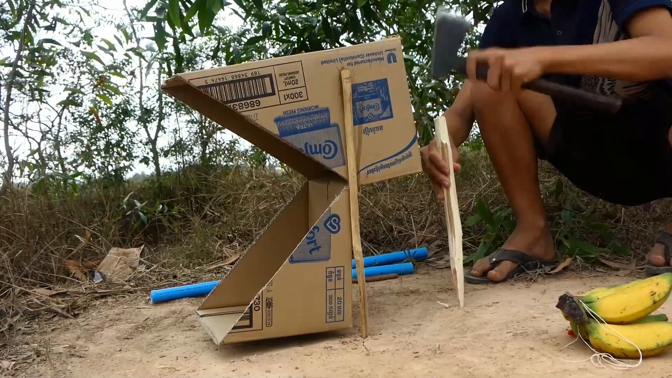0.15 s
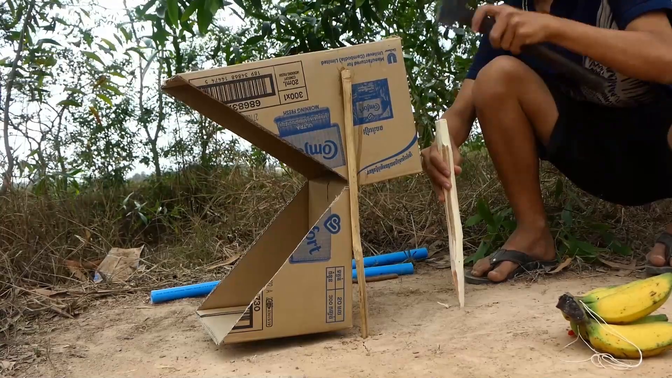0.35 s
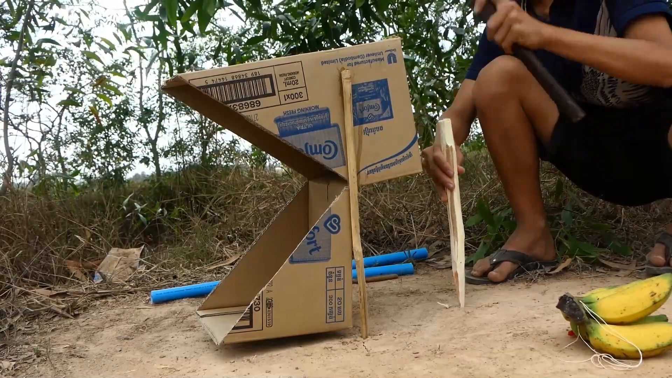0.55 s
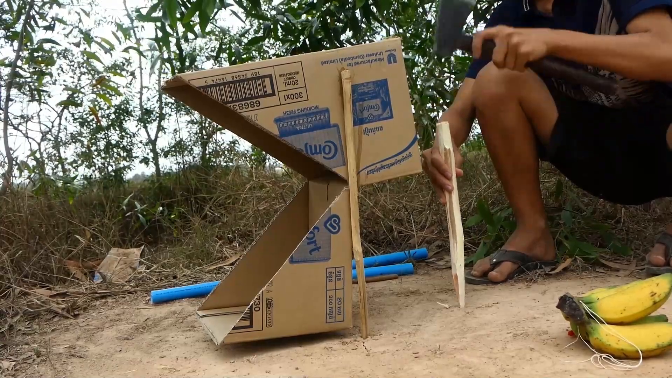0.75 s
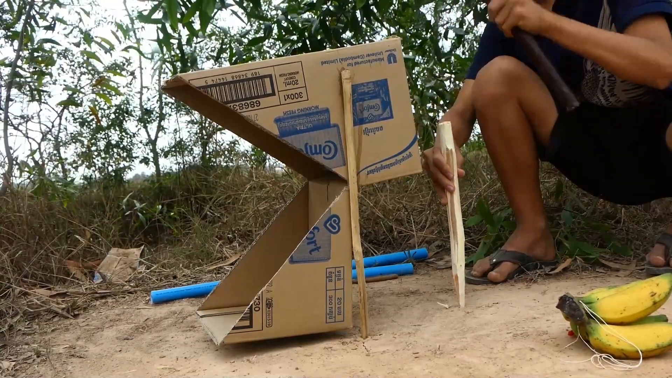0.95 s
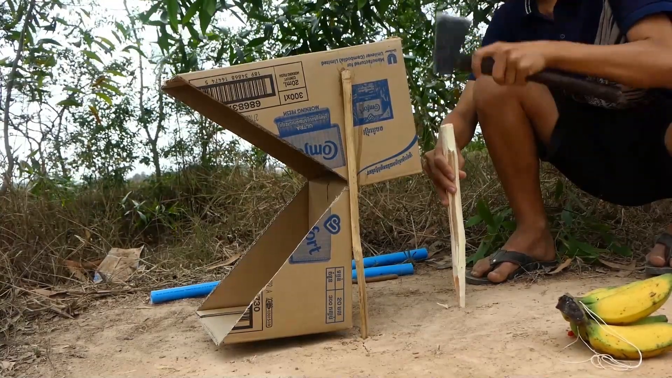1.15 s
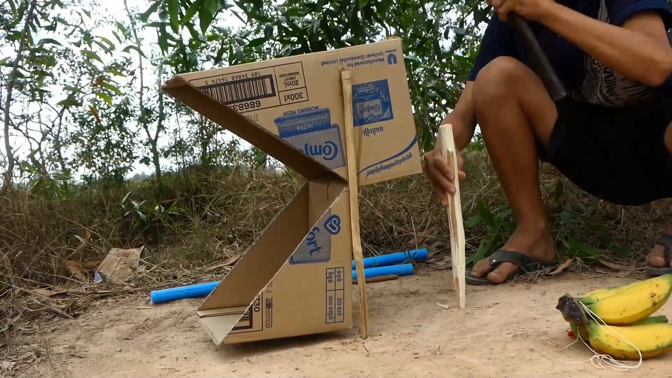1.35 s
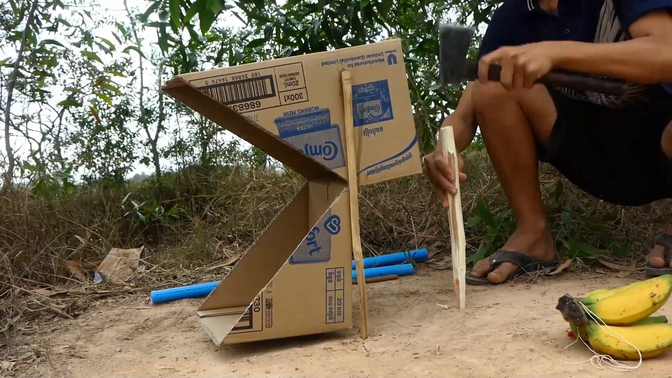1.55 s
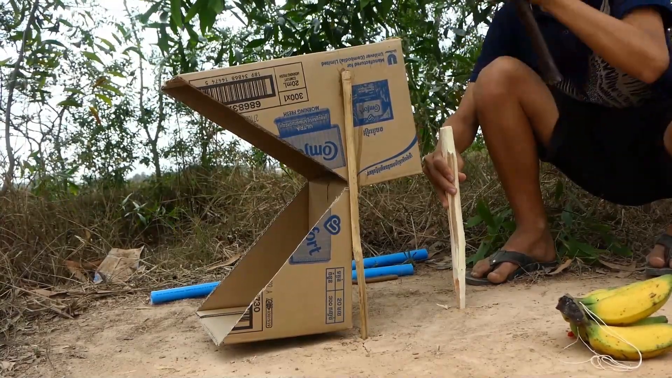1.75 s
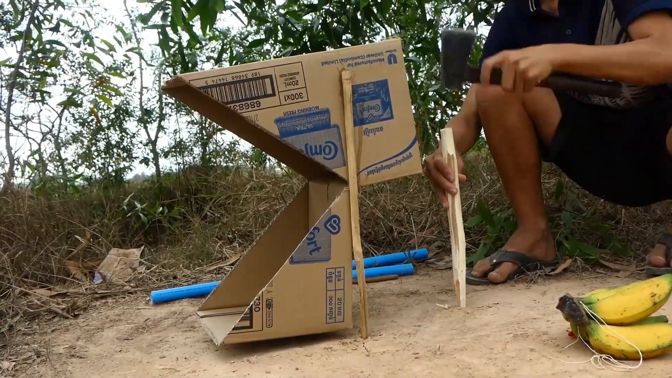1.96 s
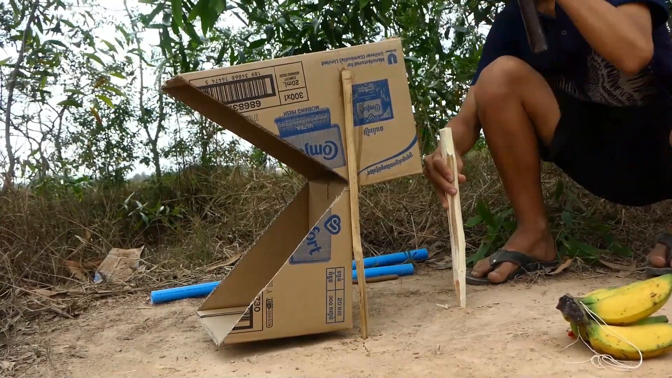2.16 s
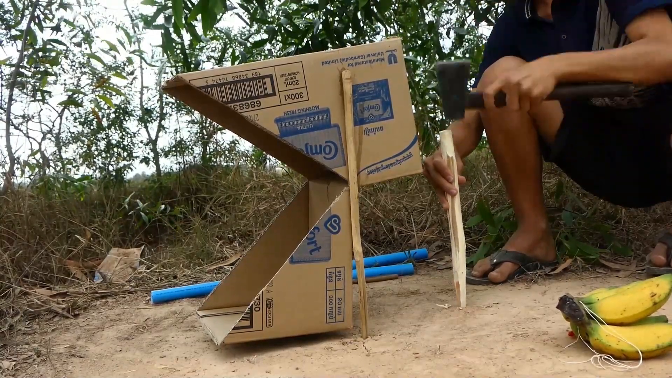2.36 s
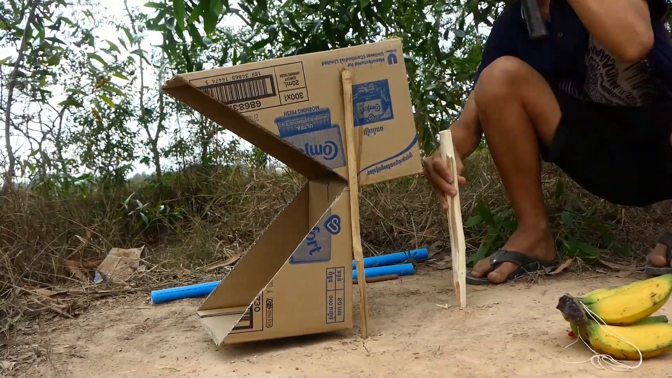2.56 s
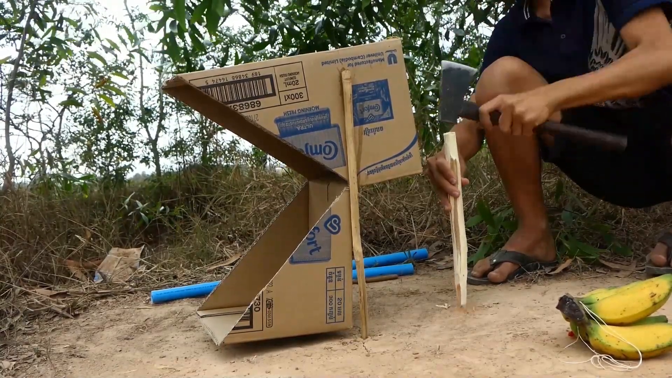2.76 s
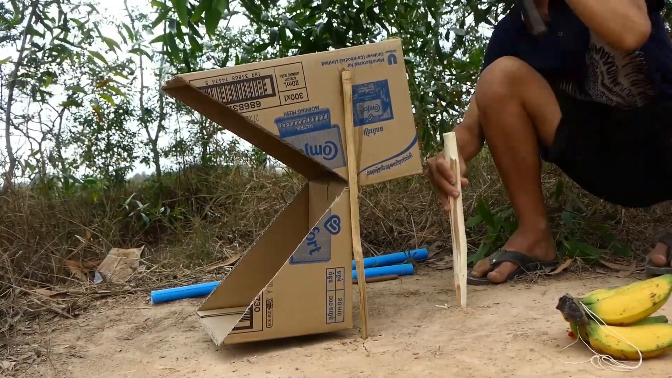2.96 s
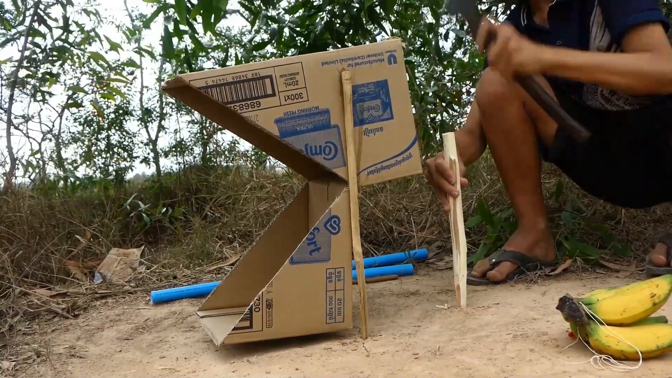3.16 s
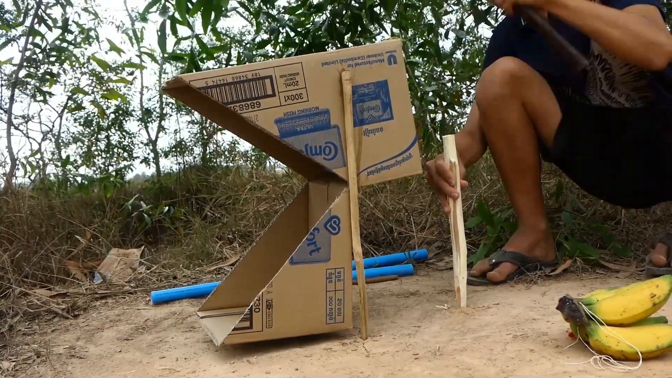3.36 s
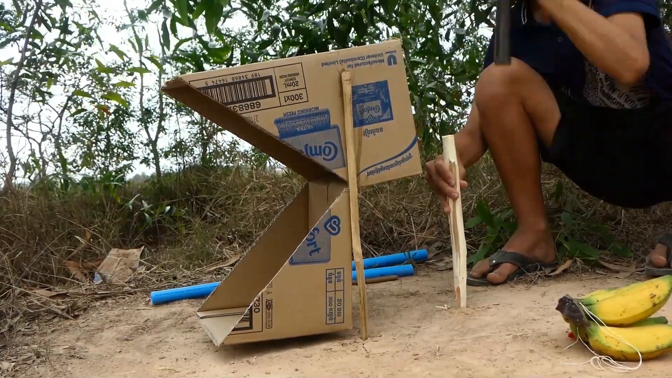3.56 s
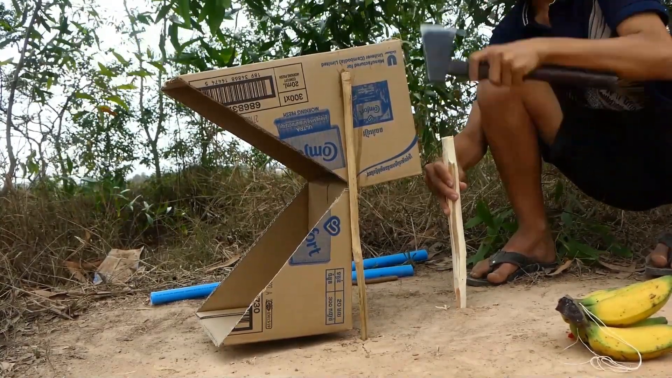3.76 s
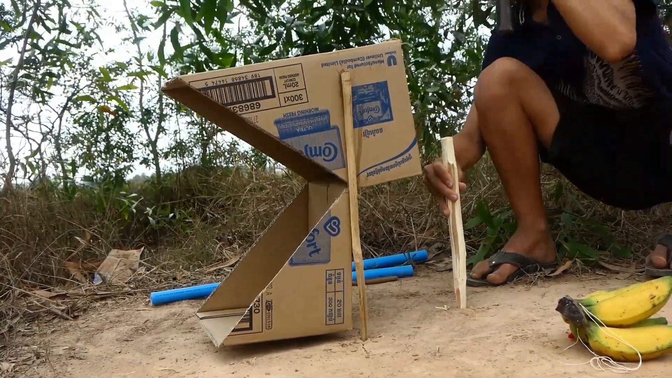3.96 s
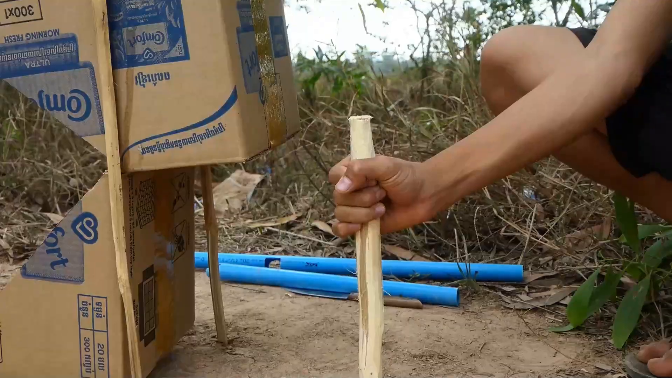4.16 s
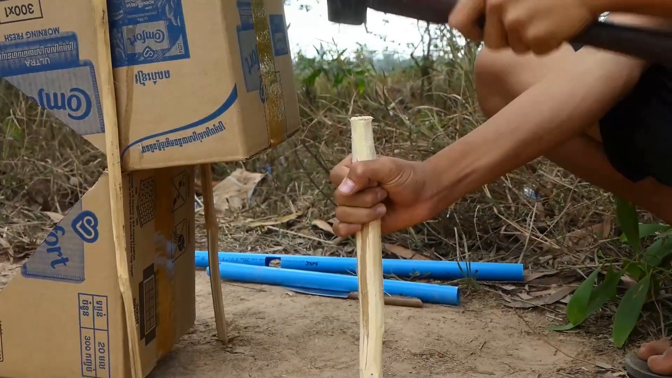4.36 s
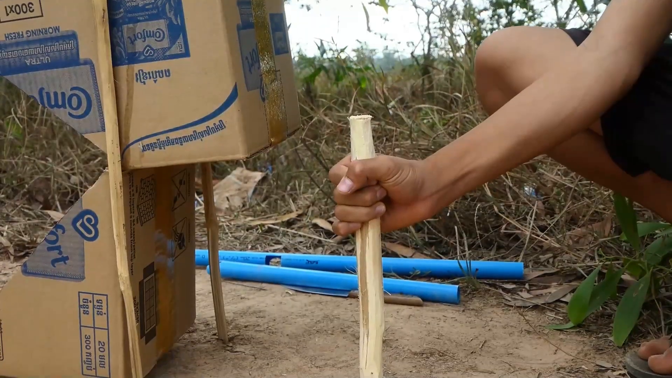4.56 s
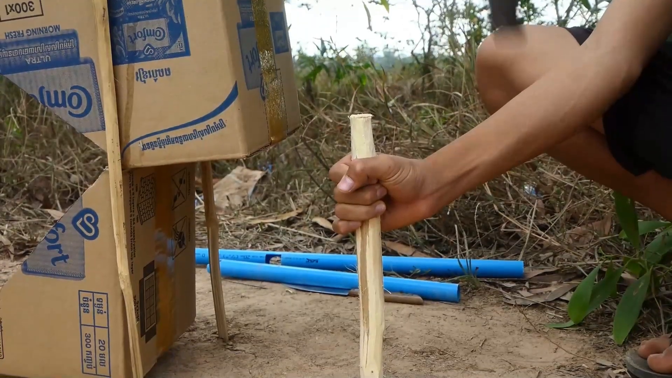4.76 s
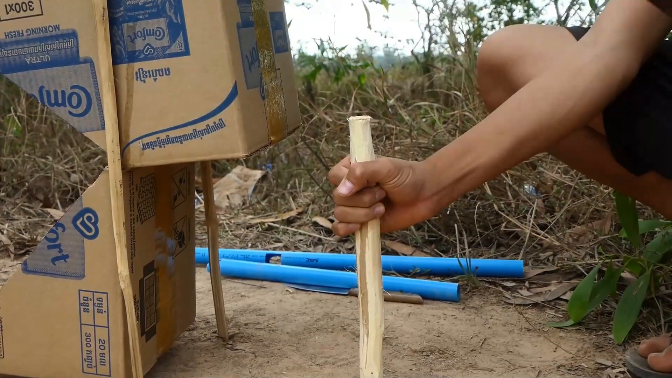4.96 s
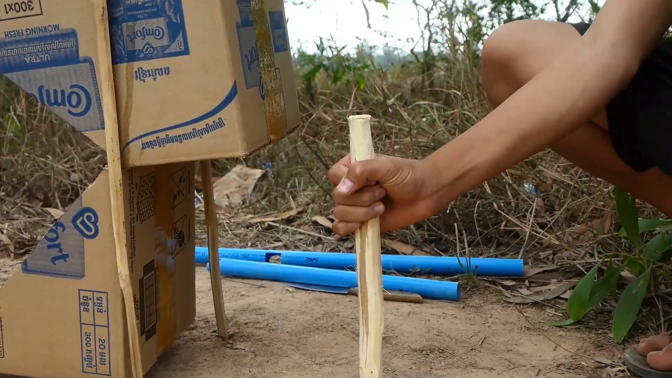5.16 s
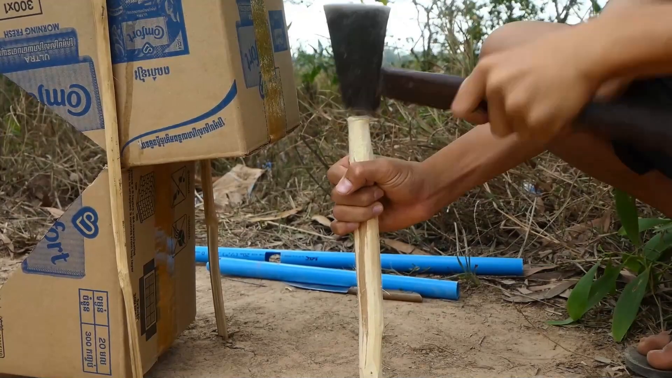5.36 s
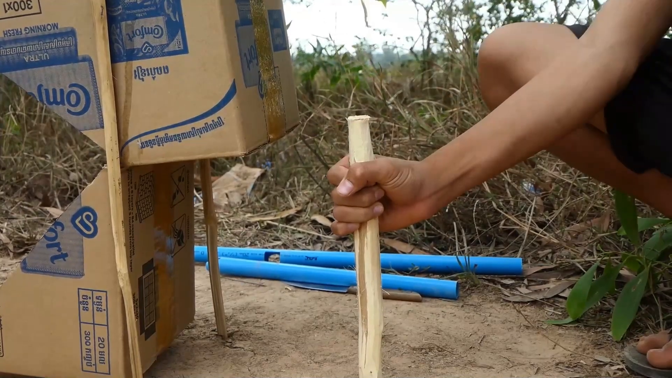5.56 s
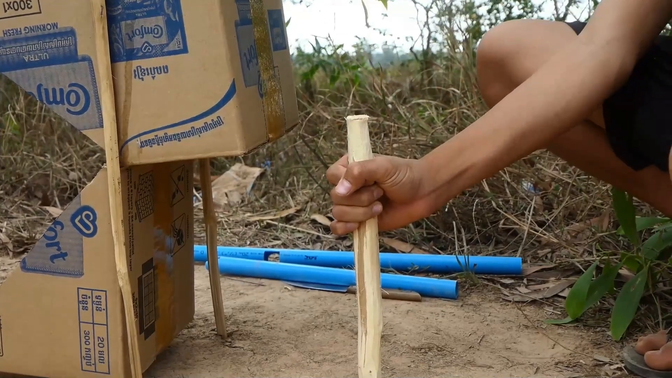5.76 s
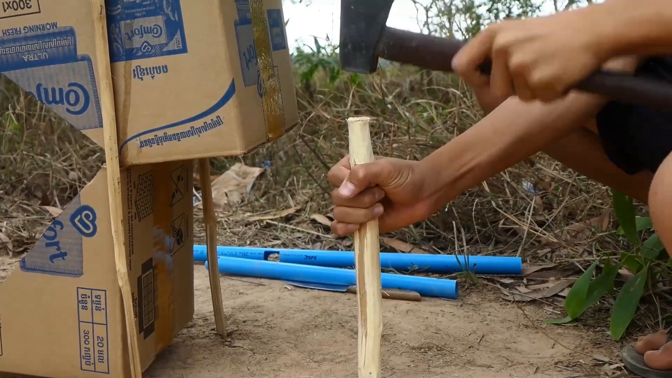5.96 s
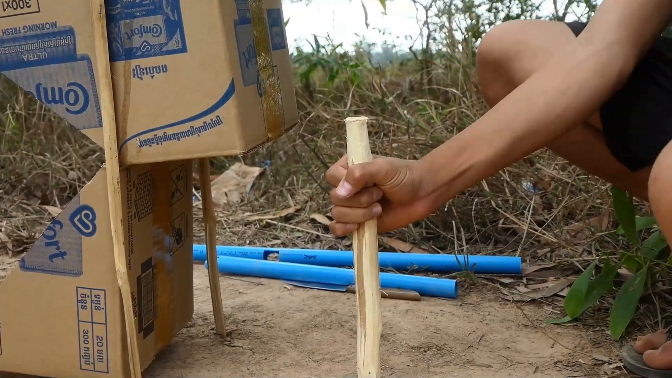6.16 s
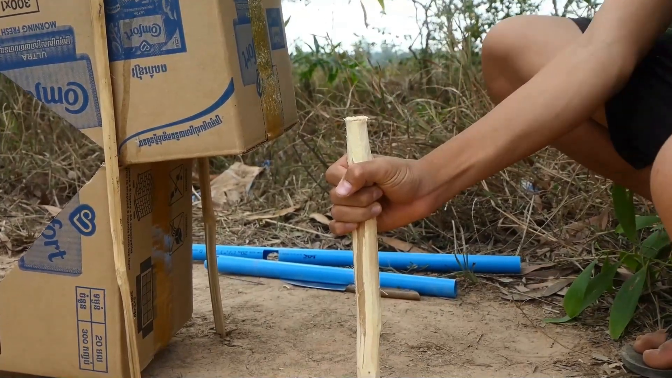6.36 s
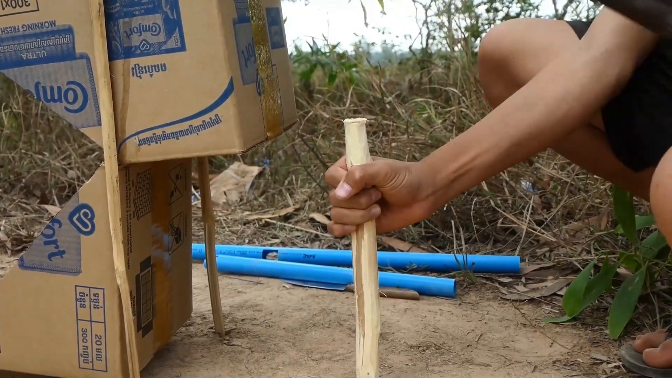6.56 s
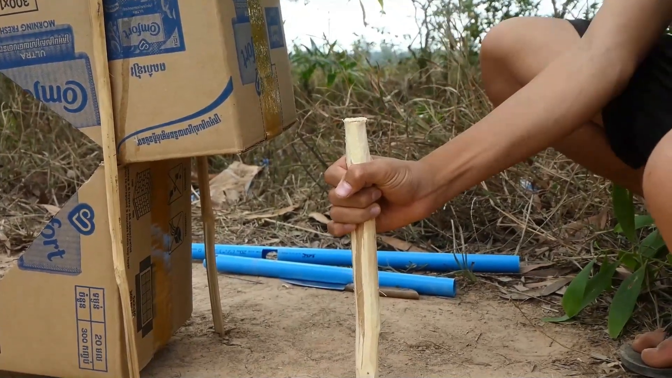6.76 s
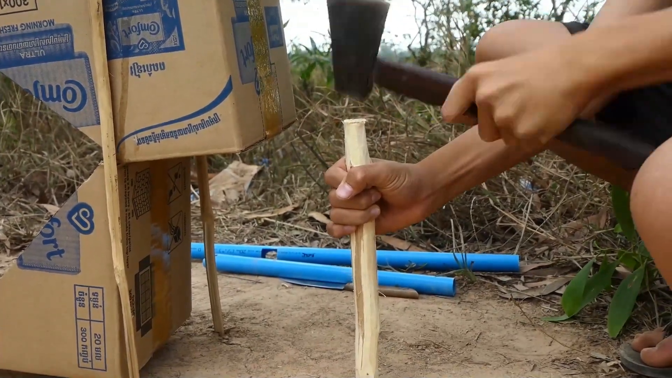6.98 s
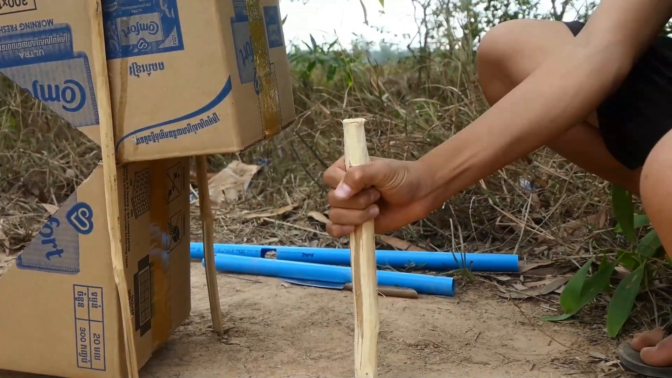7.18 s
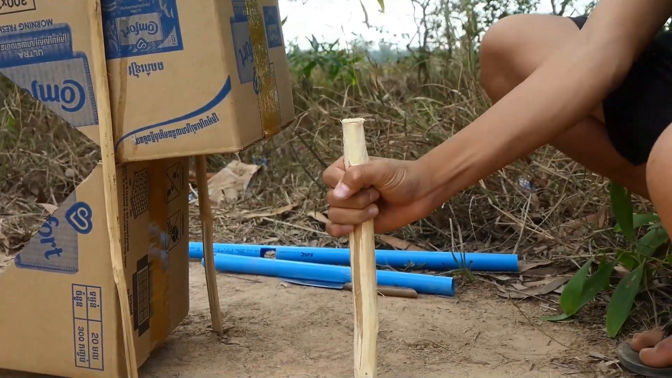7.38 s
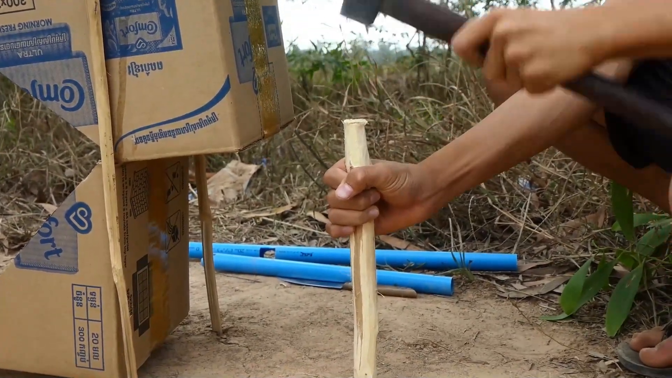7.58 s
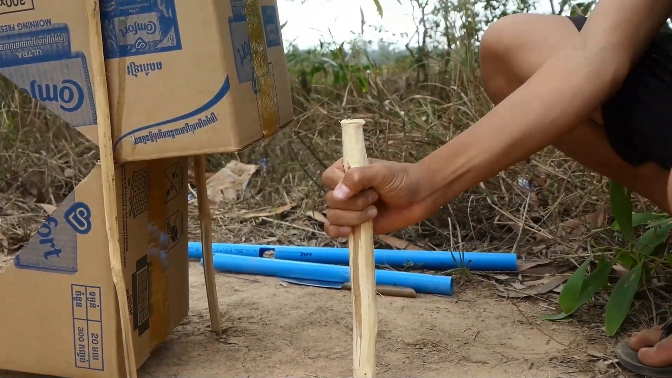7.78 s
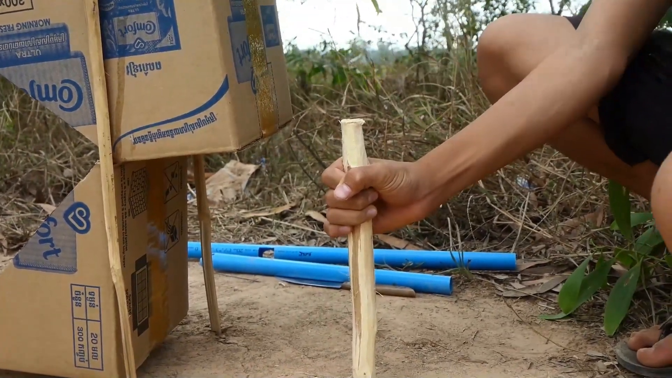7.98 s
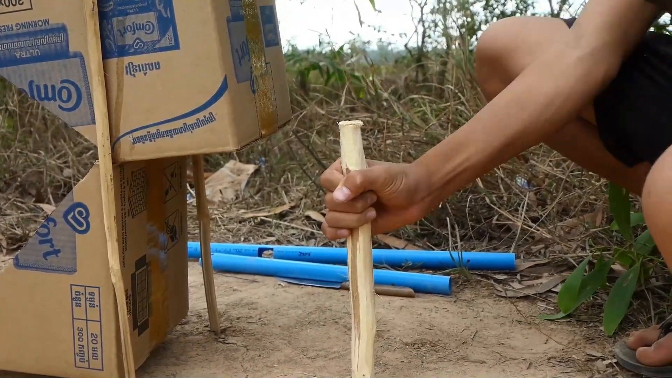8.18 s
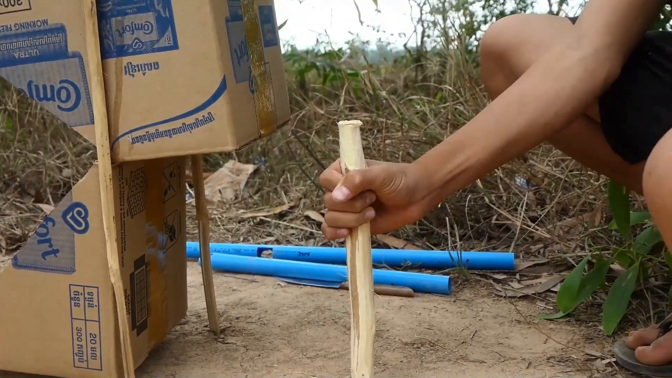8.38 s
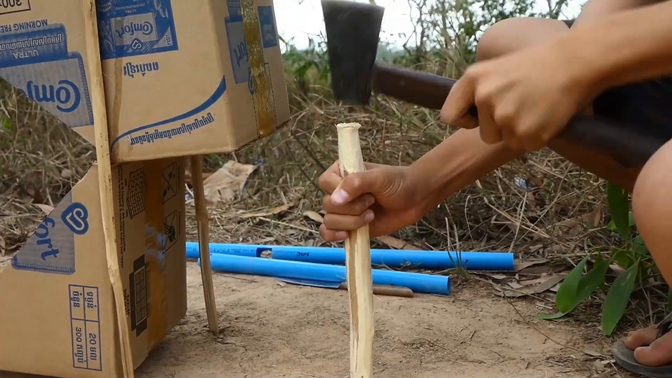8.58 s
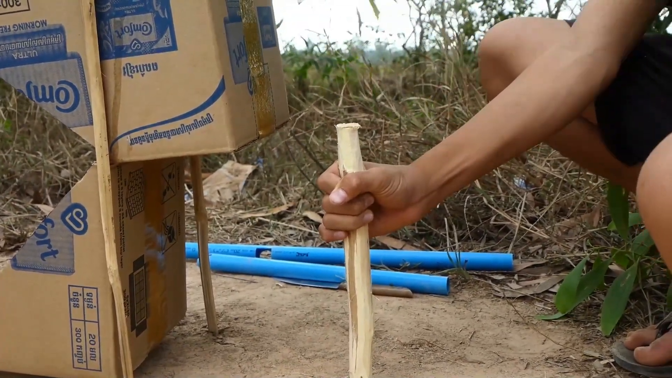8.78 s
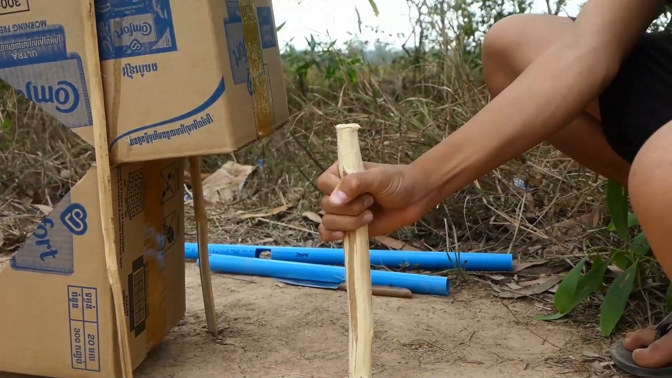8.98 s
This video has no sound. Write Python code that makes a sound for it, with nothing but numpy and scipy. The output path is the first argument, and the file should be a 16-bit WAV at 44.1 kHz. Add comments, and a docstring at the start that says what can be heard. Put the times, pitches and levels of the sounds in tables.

```python
"""Leaves hiss over a low rumble and a light breeze. From 0.3 s a wooden stake is driven into dry ground with
the back of a heavy knife: nine blows from a few steps away, then from 4.4 s nine from close by, with gusts.
Each blow is a crack, a short wooden knock of fading tones and a thud of soil tones; filtered noise makes
the crunch, the scatter from the scrub, the faint tree echo, the wind and the leaves. Litter snaps mostly near
the end. Throughout, a limiter turns everything down after loud peaks and lets it recover slowly."""
import sys
import numpy as np
from scipy import signal
from scipy.io import wavfile
from scipy.ndimage import uniform_filter1d, minimum_filter1d

SR = 44100
rng = np.random.default_rng(int(sys.argv[2]) if len(sys.argv) > 2 else 0)


def to_wav(s):
    """Save 16-bit WAV."""
    ch = np.atleast_2d(s).T  # columns
    pcm = np.round(np.clip(ch, -1, 1) * 32767)  # PCM
    wavfile.write(sys.argv[1], SR, pcm.astype(np.int16))


N = 398223
TIME = np.arange(N) / SR
CLOSE_START_S = 4.07  # blows and leaf hiss belong to the far place before this, to the close place after

# light breeze on the microphone: (time [s], level before flutter [dB], centre of the eddies [Hz])
BREEZE_POINTS = [(0, -58, 187), (1.0, -57.5, 175.2), (1.35, -52, 151.4), (2.9, -54, 149.5),
                 (3.9, -48, 167.5), (4.251, -53.5, 115), (5.8, -63.5, 165), (7.1, -51, 144),
                 (9.03, -52.5, 230)]
# gusts on top of it: (start [s], length before release [s], level before flutter [dB], centre [Hz])
GUST_EVENTS = [(4.04, 0.35, -48, 100), (4.558, .13, -39.5, 112), (4.83, 0.074, -48, 100),
               (6.155, 0.081, -44.5, 88), (6.361, .19, -40.5, 118.3), (6.596, .31, -37, 150.4),
               (7.01, 0.062, -41, 130), (7.381, 0.076, -35.5, 129), (7.692, .3, -39.5, 128),
               (8.0, .07, -31, 189), (8.313, .31, -45.5, 209), (8.778, .2, -41.5, 205)]
GUST_ATTACK_S, GUST_RELEASE_S = 0.031, 0.033
# powers of frequency by which the wind noise rises and falls around a corner (a multiple of its centre)
EDDY_RISE, EDDY_FALL, EDDY_CORNER = 2, 4.2, 1.094
FLUTTER_DB, FLUTTER_HZ = 2.5, 16

# soft bumps of air on the microphone: (time [s], level [dB], frequency [Hz], length [s])
AIR_BUMPS = [(7.417, -42, 50, 0.012), (7.446, -21.5, 65, 0.0038), (7.842, -24.5, 148, 0.0036),
             (8.293, -23.5, 260, 0.0033), (8.804, -31, 198, 0.0028)]

# tone colour of the leaf hiss at each place: (frequency [Hz], relative level [dB])
FAR_LEAF_SPECTRUM = [(250, -6), (400, -3), (520, -12), (700, -12), (930, -6), (1200, -9.5), (1600, -13.5),
                     (2700, -16.5), (3700, -12), (4600, -14.5), (6600, -16.5), (8100, -24.5), (9600, -22.5),
                     (16000, -43.5)]
NEAR_LEAF_SPECTRUM = [(240, 2.5), (400, 3.5), (496, -1), (626, -3), (893, 0), (1380, -2), (2220, -1.5),
                      (2800, -1), (3260, -1), (5780, -1.5), (10100, -12), (14600, -24.5), (16000, -50)]
# the far hiss is steady; the close hiss starts from its base level, swells and eases off
FAR_HISS_DB, NEAR_HISS_BASE_DB = -55, -53
SWELL_DB, SWELL_TOP_S, SWELL_WIDTH_S = 2.5, 7.58, 0.99

# dry litter and stalks: (time [s], level before fading [dB], decay time constant [s])
LITTER_BURSTS = [(1.213, -50, .004), (7.837, -45.5, 0.022), (7.939, -36, 0.0096), (7.955, -50, 0.056),
                 (7.984, -42.5, 0.016), (8.39, -45.5, 0.018), (8.511, -53, 0.0087), (8.951, -53, .02)]

# sound scattered by ground and scrub: (frequency [Hz], relative level [dB])
SCATTER_SPECTRUM = [(100, -31), (300, -15), (800, -12.5), (1600, -26), (3000, -22.5), (5000, -18.5),
                    (9000, -19), (15000, -25)]
# how long the scatter lasts: (frequency [Hz], time to fade by 60 dB [s])
SCATTER_FADE = [(150, 0.18), (1000, 0.059), (3000, 0.12), (10000, 0.089)]
# echo from the trees: (frequency [Hz], relative level [dB])
TREE_SPECTRUM = [(200, -41.5), (900, -49), (1700, -49), (2800, -38), (4000, -36.5), (9000, -55)]

# tones of the stake, shallow and then deeper in the ground, before each blow's own tuning and level:
# (frequency [Hz], relative level [dB], time to fade by 60 dB [s])
FAR_STAKE_TONES = [(1014, -0.6, 0.0137), (1060, -16.7, 0.0084), (1884, 6.2, 0.0104), (2097, 9.0, 0.0089),
                   (3348, 4.1, 0.0087), (4322, 1.2, 0.0087)]
NEAR_STAKE_TONES = [(867, 1.6, .011), (1092, 13.2, 0.0055), (1622, 15.9, 0.0092), (1915, 9, 0.0064),
                    (2675, 7.9, 0.01), (5204, 4.2, 0.0069)]
# tones of the stake bouncing on the soil, before each blow's own thud level:
# (frequency [Hz], relative level [dB], time to fade by 60 dB [s], direction of the first swing [+1 or -1])
FAR_SOIL_TONES = [(100, -18.7, .114, -1), (158, -17.2, .079, 1), (181, -13.2, .086, -1),
                  (227, -6.5, .056, 1), (248, -16.5, .096, 1), (345, -24, .06, 1), (437, -11, .03, -1)]
NEAR_SOIL_TONES = [(100, -13, .06, -1), (174, -15.2, .071, -1), (232, -4.6, .037, 1), (263, -12.7, .067, 1),
                   (316, -15.8, .041, -1), (420, -11, .028, 1)]
# faint ring of the steel blade, damped by the hand:
# (frequency [Hz], level [dB], time to fade by 60 dB [s])
BLADE_TONES = [(5120, -32.5, 0.088), (6360, -40.5, 0.091), (9160, -42, 0.054)]
# one row a blow; the spot that is struck sets two short rings of blade and stake:
# (time [s], stake level [dB], stake tuning [factor], thud level [dB],
#  low ring [Hz], low ring level [dB], high ring [Hz], high ring level [dB])
BLOW_ROWS = [(0.2843, -3.5, 1, -8.5, 2345, 3, 3170, 5.5), (0.7307, -4, 0.98, -9, 2310, 5.5, 3420, 3.5),
             (1.1455, -7.5, 0.96, -7.5, 2280, 3.5, 3330, -4), (1.5602, -5, 0.96, -4, 2324, 5.5, 3530, 2),
             (1.9707, -2, 1.003, -2, 2410, 12, 3960, 9.5), (2.409, -2.5, 0.98, -1, 2430, 17, 4020, 10.5),
             (2.8438, -2.4, 0.99, -2.3, 2780, 10.5, 3630, -10.8),
             (3.3126, 0.2, 1.045, 1.2, 2630, 18.5, 3940, 4.5), (3.776, 2.3, 0.98, 4.6, 2355, 10.5, 4040, 7),
             (4.3958, 5.5, 1.015, 6, 3080, 22.5, 3980, 12), (4.9345, 8.5, 1.03, 6.1, 3200, 19, 3760, 4.5),
             (5.4764, 0.5, 1.024, 0, 3110, 19, 3890, 8.6), (6.0133, 2.4, 1.023, 4.5, 3190, 17.5, 4440, 10),
             (6.553, -2.5, 1.03, 2.5, 3260, 20, 4230, 8), (7.0887, 3.5, 1.01, 4, 3026, 19.5, 3750, 12),
             (7.6357, 2, 1, 2, 3080, 9.5, 3350, 6), (8.1603, -4, 1.04, -3, 3050, 16, 3900, 9.5),
             (8.6908, -5, 1.05, -7.5, 2980, 12.3, 4820, 7.5)]
RING_T60_S = 0.0068
# a harder contact rings more; crack and crunch grow with the low ring [dB per dB]
CRACK_PER_RING, GRIT_PER_RING = 0.78, 0.33

# the two microphone ports differ by a weak reflection off the camera body
PORT_DELAY_S, PORT_DB = 0.00022, -16.5
EDGE_HZ = 16400  # upper edge of the finished sound


def amp(db):
    """Turns decibels into a multiplier."""
    return 10 ** (np.asarray(db) / 20)


def unit(x):
    """Scales a sound to an average (rms) strength of one."""
    return x / np.sqrt(np.mean(x ** 2) + 1e-20)


def fade_60(t, t60):
    """Natural fading: the level drops by 60 dB in each t60 seconds."""
    return np.exp(-np.log(1000) * t / t60)


def read(points, hz):
    """Reads between the points of a table, with frequency on a log scale."""
    f, value = np.transpose(points)
    return np.interp(np.log(hz + 1), np.log(f + 1), value)


def add(mix, s, sound):
    """Mixes a sound in at time s, cutting it off at the end of the mix."""
    part = mix[..., round(s * SR):][..., :sound.shape[-1]]
    part += sound[..., :part.shape[-1]]


def cut(x, hz, kind, order=2):
    """Keeps low, high or middle frequencies with a smooth (Butterworth) filter."""
    sos = signal.butter(order, np.minimum(hz, .49 * SR), kind, fs=SR, output="sos")
    return signal.sosfilt(sos, x)


def ring(tones, t, wave):
    """A struck body sounds as a sum of tones, each fading at its own speed."""
    return sum(amp(db) * fade_60(t, t60) * wave(2 * np.pi * hz * t) for hz, db, t60 in tones)


def noise(shape, side_db, length=N, size=512):
    """Stereo noise with gain shape(Hz, s); the two close ports share most of it."""
    mid, side = rng.standard_normal((2, length))
    side = amp(side_db) * side
    pair = np.array([mid + side, mid - side])
    hz, t, spectrum = signal.stft(pair, SR, nperseg=size)
    shaped = spectrum * shape(hz[:, None], t)
    return signal.istft(shaped, SR, nperseg=size)[1][:, :length]


def rumble(db=-57.5, centre_hz=112, width=.52):
    """A steady low rumble from far away: noise with a broad hump of low frequencies."""
    def hump(hz, t):
        distance = np.log((hz + 1) / centre_hz) / width
        return 1 / (1 + distance ** 2) ** 2
    return amp(db) * unit(cut(noise(hump, -11.5, size=4096), 45, "high"))


def eddies(centre_hz):
    """Air tumbling at the ports: a fluttering hump of low noise around centre_hz(s)."""
    def shape(hz, t):
        centre = centre_hz(t)
        ratio = hz / (EDDY_CORNER * centre)
        slopes = ratio ** EDDY_RISE / np.sqrt(1 + ratio ** (2 * (EDDY_RISE + EDDY_FALL)))
        return slopes / np.sqrt(centre)
    flutter = unit(cut(rng.standard_normal(N), FLUTTER_HZ, "low"))
    air = unit(cut(noise(shape, -6.0, size=2048), 42, "high"))
    return air * amp(FLUTTER_DB * flutter)


def breeze():
    """A light, slowly changing flow of air tumbles over the microphone."""
    s, db, centre_hz = np.transpose(BREEZE_POINTS)
    level = amp(np.interp(TIME, s, db))
    return eddies(lambda t: np.interp(t, s, centre_hz)) * level


def gusts():
    """Each gust of air rises quickly, holds and drops away, with its own eddy pitch."""
    level = np.zeros(N)
    for start, length, db, _ in GUST_EVENTS:
        rise = (TIME - start) / GUST_ATTACK_S
        fall = 1 - (TIME - start - length) / GUST_RELEASE_S
        level += amp(db) * np.clip(rise, 0, 1) * np.clip(fall, 0, 1)
    starts, _, _, centre_hz = np.transpose(GUST_EVENTS)

    def latest_centre(t):
        return centre_hz[np.maximum(np.searchsorted(starts, t) - 1, 0)]
    return eddies(latest_centre) * level


def bumps():
    """Brief swings of air pressure: a low wave under a smooth bell-shaped level."""
    out = np.zeros(N)
    for s, db, hz, length in AIR_BUMPS:
        bell = np.exp(-((TIME - s) / length) ** 2)
        out += amp(db) * bell * -np.cos(2 * np.pi * hz * (TIME - s))
    return out


def foliage(patchy_db=0.75):
    """Countless leaves blend into a wide hiss with slowly drifting patches."""
    def hiss(spectrum):
        def shape(hz, t):
            patches = rng.standard_normal((len(hz), len(t)))
            patches = uniform_filter1d(patches, 8, 0)  # smooth over frequency
            patches = unit(uniform_filter1d(patches, 14, 1))  # smooth over time
            return amp(read(spectrum, hz) + patchy_db * patches)
        return unit(noise(shape, -5.5))
    swell = np.exp(-((TIME - SWELL_TOP_S) / SWELL_WIDTH_S) ** 2)
    far = amp(FAR_HISS_DB) * hiss(FAR_LEAF_SPECTRUM)
    near = amp(NEAR_HISS_BASE_DB + SWELL_DB * swell) * hiss(NEAR_LEAF_SPECTRUM)
    return np.where(TIME < CLOSE_START_S, far, near)


def litter(grain_db=5.5):
    """Dry leaves crackle in short bursts of tiny snaps of uneven strength."""
    t, out = np.arange(SR // 4) / SR, np.zeros(N)
    for s, db, decay in LITTER_BURSTS:
        # about 5000 snaps per second, a few of them much stronger
        snaps = rng.standard_normal(len(t)) * (rng.random(len(t)) < 5000 / SR)
        snaps *= amp(grain_db * np.minimum(rng.exponential(1, len(t)), 4))
        crackle = unit(cut(snaps, [2300, 8500], "band"))
        add(out, s, amp(db) * crackle * np.exp(-t / decay))
    return out


def outdoors(x, rows, scatter_db, echo_db, echo_s):
    """Each blow is scattered by the scrub close by, then returns faintly from a row of trees."""
    length = SR // 3
    t, out = np.arange(length) / SR, np.zeros((2, N))

    def scatter_shape(hz, u):
        return amp(read(SCATTER_SPECTRUM, hz)) * fade_60(u, read(SCATTER_FADE, hz))

    def tree_shape(hz, u):
        return amp(read(TREE_SPECTRUM, hz))
    for s in np.transpose(rows)[0]:
        scatter = noise(scatter_shape, -5.5, length, size=256)
        scatter *= (1 - np.exp(-t / 0.0018)) * amp(scatter_db) / np.sqrt(0.0064 * SR)
        # a short and a longer hump of echo share one centre
        swell = .45 * np.exp(-((t - echo_s) / .012) ** 2)
        swell += .7 * np.exp(-((t - echo_s) / .07) ** 2)
        echo = noise(tree_shape, -10, length) * swell * amp(echo_db) / np.sqrt(0.066 * SR)
        blow = x[None, round(s * SR):][:, :length]
        add(out, s, signal.fftconvolve(blow, scatter + echo, axes=1))
    return out


def grit(rows, db, t60=0.11):
    """Dry soil crunches as the point sinks: fading grains, stronger after a sharper blow."""
    t, out = np.arange(SR // 5) / SR, np.zeros(N)
    for s, _, _, _, _, ring_db, _, _ in rows:
        grains = rng.standard_normal(len(t)) * (rng.random(len(t)) < 12000 / SR)
        crunch = unit(cut(grains, [2800, 6400], "band")) * fade_60(t, t60)
        add(out, s + 0.0032, amp(db + GRIT_PER_RING * ring_db) * crunch)
    return out


def blows(rows, stake, soil, contact_s, low_edge_hz, top_edge_hz, crack_db, crack_t60):
    """Steel meets end grain: a crack, a few cycles of knock, then the soil takes the push."""
    t, out = np.arange(SR // 4) / SR, np.zeros(N)
    # soil tones of nearby pitch beat against each other, so the thud swells and fades
    thud = sum(np.sign(way) * ring([tone], t, np.sin) for *tone, way in soil)
    thud = cut(thud * (1 - np.exp(-t / .002)), 60, "high", order=3)
    for s, stake_db, tuning, thud_db, low_hz, low_db, high_hz, high_db in rows:
        tones = [(hz * tuning, db + stake_db, t60) for hz, db, t60 in stake]
        tones += [(low_hz, low_db, RING_T60_S), (high_hz, high_db, RING_T60_S)]
        # crushed fibres on top cushion the contact, and the thin stake radiates little bass
        knock = ring(tones, t, np.cos) * (1 - np.exp(-t / contact_s))
        knock = cut(knock, [low_edge_hz, top_edge_hz], "band")
        # the ground and the cardboard box close by throw the knock back within milliseconds
        lags = rng.uniform(.0008, .004, size=2)
        knock = knock + sum(amp(-14.5) * np.interp(t - lag, t, knock) for lag in lags)
        knock = knock + ring(BLADE_TONES, t, np.sin)
        crack = cut(rng.standard_normal(len(t)), [4000, 9000], "band") * fade_60(t, crack_t60)
        crack_level = amp(crack_db + CRACK_PER_RING * low_db)
        add(out, s, knock + amp(thud_db) * thud + crack_level * crack)
    return out


def ports(x, pan_db):
    """Nearly the same sound reaches both ports; a weak late copy is added in one, subtracted in the other."""
    side = amp(PORT_DB) * np.interp(TIME - PORT_DELAY_S, TIME, x)
    return np.array([x + side, x - side]) * amp([[pan_db / 2], [-pan_db / 2]])


def scene():
    """The two runs of blows in the open air, with the wind, leaves and litter around them."""
    far_rows = [row for row in BLOW_ROWS if row[0] < CLOSE_START_S]
    near_rows = [row for row in BLOW_ROWS if row[0] >= CLOSE_START_S]
    background = rumble() + breeze() + gusts() + bumps() + foliage() + litter()
    far = blows(far_rows, FAR_STAKE_TONES, FAR_SOIL_TONES, contact_s=0.00076,
                low_edge_hz=540, top_edge_hz=5100, crack_db=-14.5, crack_t60=0.012)
    near = blows(near_rows, NEAR_STAKE_TONES, NEAR_SOIL_TONES, contact_s=0.0007,
                 low_edge_hz=803, top_edge_hz=7000, crack_db=-13.0, crack_t60=0.012)
    returns = outdoors(far, far_rows, scatter_db=2.0, echo_db=0.5, echo_s=.11)
    returns += outdoors(near, near_rows, scatter_db=-0.5, echo_db=-5.0, echo_s=0.13)
    soil = grit(far_rows, db=-38.5) + grit(near_rows, db=-36.0)
    direct = ports(far, pan_db=-.3) + ports(near, pan_db=.6)
    return background + returns + soil + direct


def record(dry, ceiling_db=1.22, recovery_s=0.14):
    """A limiter turns loud peaks down just ahead of time and recovers slowly; then the top treble is cut."""
    peak = -minimum_filter1d(-abs(dry).max(0), size=31)  # loudest sample within about 0.3 ms either side
    over_db = np.maximum(20 * np.log10(peak + 1e-9) - ceiling_db, 0)
    # each cut in level, in dB, shrinks back exponentially until a larger one takes over
    fade = np.exp(-TIME / max(recovery_s, .02))
    cut_db = np.maximum.accumulate(over_db / fade) * fade
    held = np.clip(dry * amp(-cut_db), -1, 1)  # the ceiling is above full scale, so tips are clipped
    treble_cut = signal.firwin(255, EDGE_HZ, window=("kaiser", 9), fs=SR)
    return signal.oaconvolve(held, treble_cut[None], "same")


dry = scene()
out = record(dry)
to_wav(out)
```